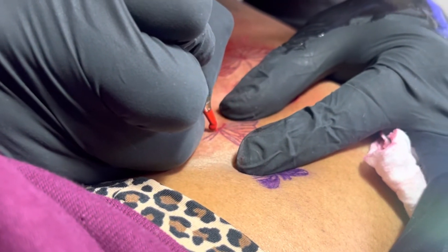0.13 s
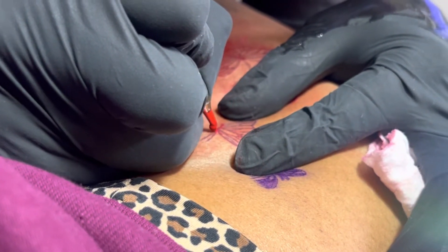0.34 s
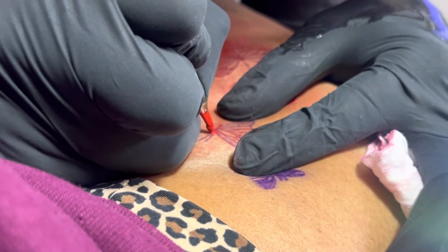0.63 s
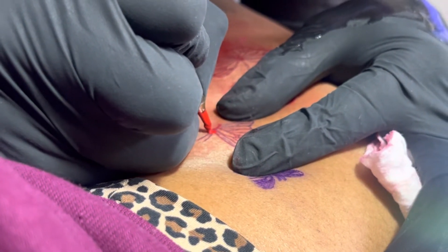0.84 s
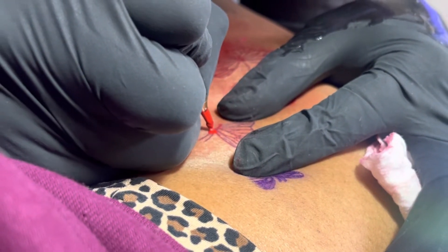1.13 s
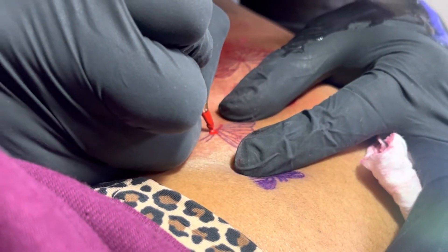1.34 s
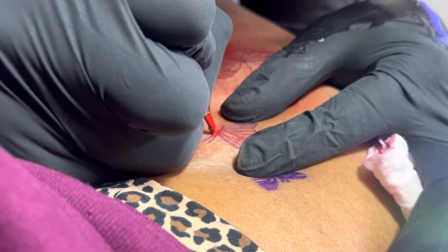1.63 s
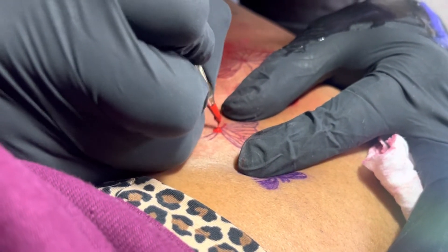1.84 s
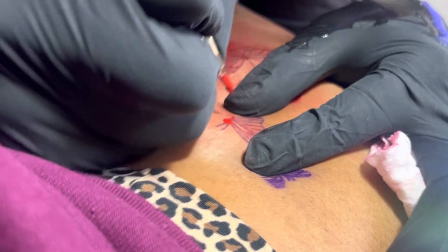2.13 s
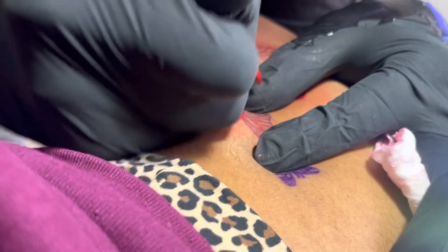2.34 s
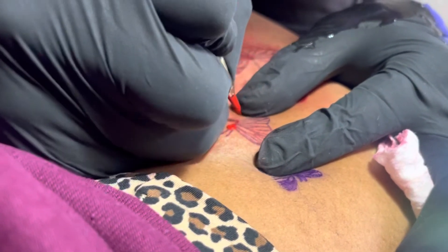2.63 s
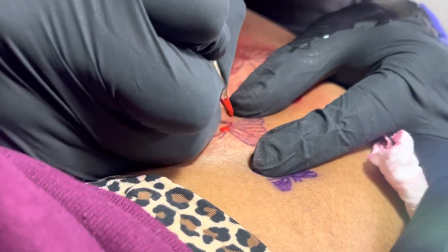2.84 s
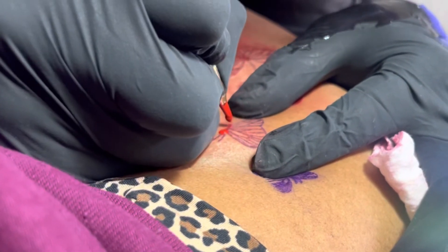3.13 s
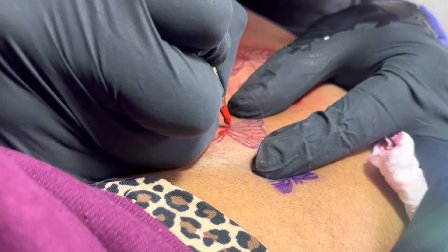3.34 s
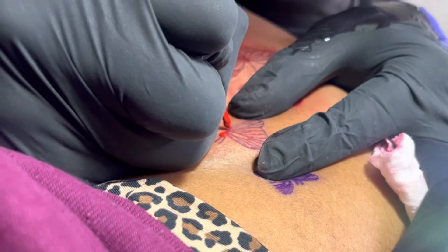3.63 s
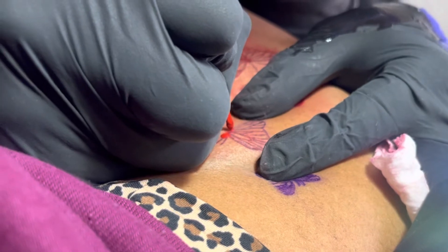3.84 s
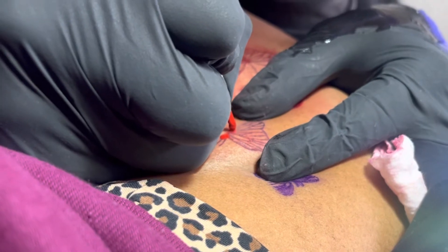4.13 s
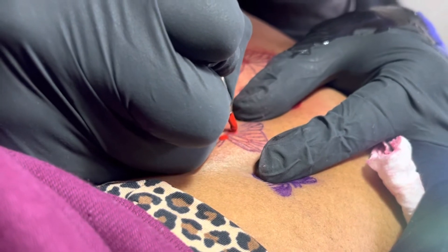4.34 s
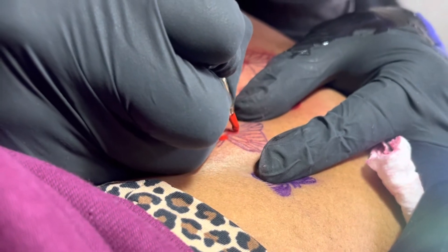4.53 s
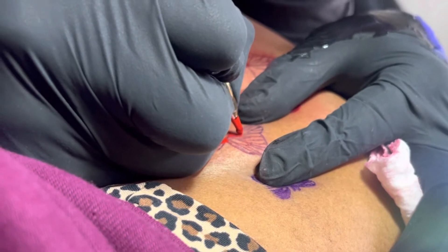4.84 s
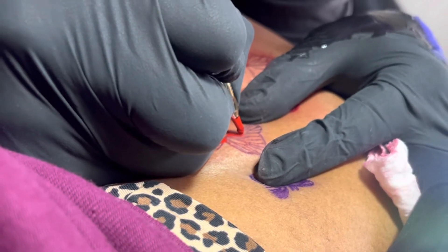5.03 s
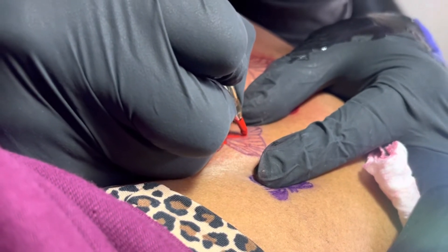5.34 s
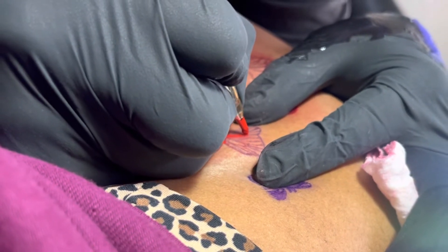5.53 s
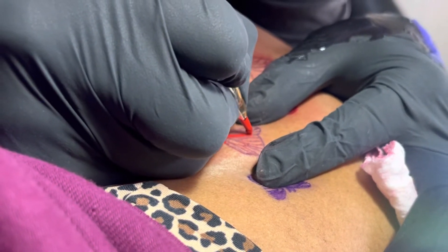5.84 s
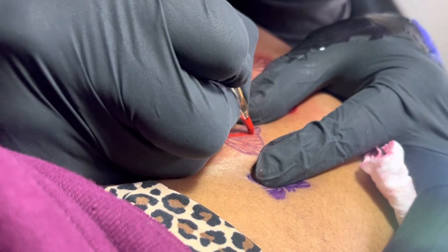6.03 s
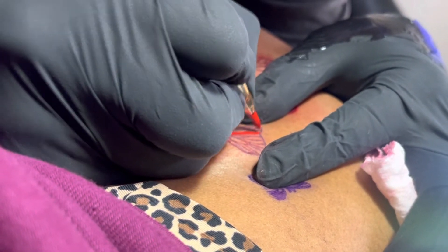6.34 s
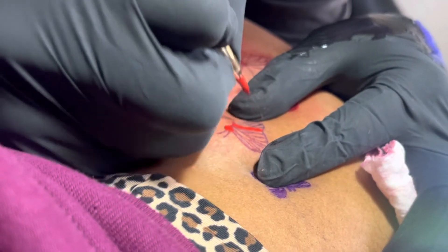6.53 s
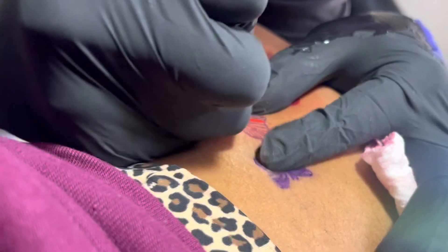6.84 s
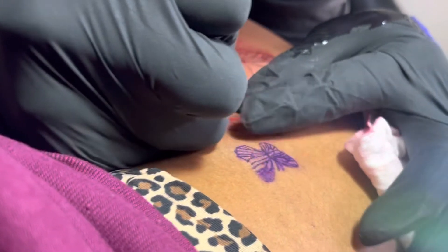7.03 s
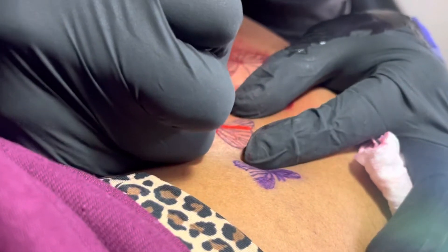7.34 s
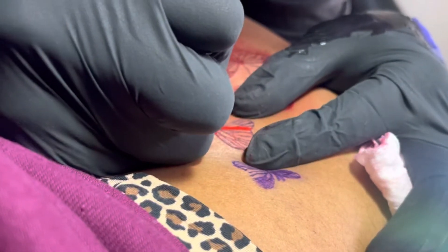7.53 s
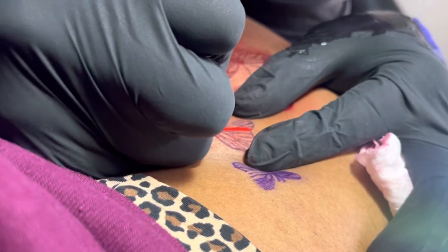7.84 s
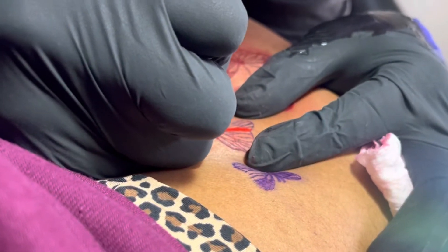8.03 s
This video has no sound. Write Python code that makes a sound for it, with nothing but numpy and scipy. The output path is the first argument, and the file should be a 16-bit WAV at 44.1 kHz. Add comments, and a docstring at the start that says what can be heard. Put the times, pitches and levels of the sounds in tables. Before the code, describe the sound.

A coil tattoo machine runs nonstop very close to a stereo microphone, a hard, bright metallic buzz with a low hum and fine rattling. Its tone wavers slightly as the hand lifts near two seconds and again after six. Behind it lies quiet studio air and street rumble; a vehicle's low drone swells briefly around three seconds and fades.

```python
"""A hard metallic buzz, about 107 strokes a second, is heard close by: a coil tattoo machine in a small studio.
Impact excitation: the armature bar strikes the coil core and rebounds, ringing the modes of the steel frame.
Periodic motion makes the frame hum in harmonics, and loose parts rattle as noise in bursts within each stroke.
Filtered noise forms the studio air and street rumble; resonant noise and a wavering drone form a vehicle
that swells through the room's low resonances. Two microphone ports differ in level and phase."""
import sys
import numpy as np
from scipy import signal
from scipy.fft import rfft, irfft, next_fast_len
from scipy.io import wavfile
from scipy.ndimage import uniform_filter1d, map_coordinates

SR = 44100
rng = np.random.default_rng(int(sys.argv[2]) if len(sys.argv) > 2 else 0)


def store_wav(level_fs):
    """Save 16-bit WAV to argv[1]."""
    pcm = np.round(np.clip(np.atleast_2d(level_fs), -1, 1) * 32767)
    wavfile.write(sys.argv[1], SR, pcm.T.astype(np.int16))


N = 361179

# Phase of the left port ahead of the right: (frequency [Hz], lead [rad])
PORT_LEAD = [(20, 0), (110, .4), (430, .7), (700, 1.2), (1000, 3.3), (1290, 6.4), (1390, 7), (1500, 8.8),
             (1610, 9.5), (1720, 12.9), (5000, 12.7), (5600, 12), (7840, 9.7), (9560, 9.1), (11000, 6.3),
             (13400, 5.7), (14400, 9.4), (15700, 9.4)]
# Likeness of the noise at the two ports: (frequency [Hz], likeness [0-1])
PORT_LIKENESS = [(50, 0.98), (150, 0.99), (300, 0.92), (700, 0.29), (1500, 0.041), (3000, 0.86),
                 (6000, 0.72), (8000, 1), (12500, 1)]

# Spectrum of studio air and street: (frequency [Hz], relative density [dB per Hz])
AIR_SPECTRUM = [(25, -39), (40, -4), (54, 4), (75, -3), (110, -4), (160, -13), (260, -18), (450, -21.5),
                (580, -14), (700, -22.5), (1060, -23), (1400, -27.5), (1700, -31.5), (2200, -36.5),
                (5000, -89)]
# Balance of that air: (frequency [Hz], left over right [dB])
AIR_BALANCE = [(50, 2.5), (300, 2.5), (1000, 1), (2000, 1.5)]
# Murmur around 600 Hz: (time [s], relative level [dB])
MURMUR_LEVEL = [(0.0, 0), (1.5, -3.5), (2.4, -1), (3.5, 0.5), (5.0, 0), (6.5, -0.5), (7.3, 2), (8.19, 2.5)]
AIR_DB = -48.5
BASS_SWELL_DB, MURMUR_SWELL_DB = 0.9, 1.6  # rms wander of each band

# Low room resonances: (frequency [Hz], width [Hz], relative level [dB])
DEEP_MODES = [(53.5, 7.1, 2.5), (85.3, 12, -1), (109, 18, -0.5)]
# Higher room resonances: (frequency [Hz], width [Hz], relative level [dB])
UPPER_MODES = [(184, 14, 5), (218, 14, 1), (260, 24, -10), (318, 9, -4), (342, 11, -3), (391, 22, -9),
               (456, 20, -13)]
# One vehicle leaving, one passing: (nearest time [s], level of deep part [dB], level of upper part [dB])
VEHICLE_PASSES = [(0.02, -41, -54.5), (2.92, -39, -46)]
# Swell, a row each for deep and upper part: (peak ahead of nearest [s], rise scale [s], fall scale [s])
SWELL_TIMES = [(.15, .5, 0.26), (.17, 0.4, 0.32)]
# Surges of the vehicle's drone at the left port: (time [s], level [dB])
DRONE_LEVEL = [(0.0, -70), (.3, -81), (2.0, -76), (2.26, -48.5), (2.46, -51), (2.58, -41.5), (2.68, -44),
               (2.77, -39), (2.92, -32.5), (3.01, -37), (3.18, -43), (3.33, -63), (3.5, -71), (8.19, -73)]
# Pitch course of the drone: (time [s], frequency [Hz])
DRONE_PITCH = [(0, 142), (2.5, 141), (2.75, 144), (2.92, 150), (3.2, 142), (8.19, 140)]
DRONE_WAVER_HZ, SURGE_DB = 3, 1.2  # rms waver of the drone's pitch; rms wander of the noise

# Stroke rate, sagging as the needle loads the spring: (time [s], rate [strokes per s])
STROKE_RATE = [(0.0, 106.75), (0.17, 107.4), (0.38, 106.75), (1.0, 106.8), (1.24, 107.1), (1.45, 106.75),
               (2.75, 106.9), (3.0, 107.35), (3.42, 107.4), (3.82, 106.55), (4.45, 106.65), (4.9, 106.0),
               (5.15, 106.45), (5.9, 106.2), (6.06, 106.55), (6.24, 106.15), (6.42, 107.05), (7.0, 107.05),
               (7.18, 106.65), (7.62, 107.35), (8.06, 107.35), (8.19, 107.1)]
RATE_WAVER_HZ = 0.16  # rms about that course

# The hand shifts along the line: (time [s], hand position [0-5])
HAND_POSITION = [(0, 0), (1.7, 0), (1.85, 1), (3.5, 1), (3.75, 2), (4.25, 2), (4.6, 3), (6.2, 3), (6.4, 4),
                 (6.6, 4), (6.8, 5), (8.19, 5)]
# The hand lifts to a new place: (time [s], height [0-1])
HAND_LIFT = [(0, 0), (1.66, 0), (1.72, .2), (1.8, 0), (1.95, .1), (2.12, .5), (2.25, .2), (2.42, .35),
             (2.55, 0), (6.27, 0), (6.36, 1), (6.58, .9), (6.7, .5), (6.85, .55), (7.08, 0), (8.19, 0)]
# Frame hum: (multiple of stroke rate, six left levels for hand positions 0 to 5 [dB], left over right [dB])
HUM_HARMONICS = [(1, -53, -51, -53, -53, -55, -51, 5), (2, -71, -70, -74, -67, -68, -70, 4),
                 (3, -61.5, -68, -60, -60, -73, -74, 4), (4, -69, -71, -67, -69, -71, -72, 5),
                 (5, -75, -73, -70, -72, -71, -72, 3), (6, -60, -60, -61, -60, -59, -57, 9),
                 (7, -59, -59, -59, -58, -60, -61, 14), (8, -55, -56, -58, -64, -57, -57, 13),
                 (9, -56, -56, -58, -61, -59, -57, 22), (10, -55, -55, -56, -55, -54, -54, 19),
                 (11, -56, -57, -59, -61, -60, -56, 10), (12, -56, -65, -60, -62, -74, -61, 11),
                 (13, -70, -72, -69, -71, -67, -78, 0), (14, -67, -70, -75, -68, -73, -68, 3),
                 (15, -74, -74, -74, -73, -78, -77, -2), (16, -76, -80, -74, -77, -72, -77, 2),
                 (17, -83, -80, -87, -85, -92, -87, 0), (18, -76, -79, -79, -78, -87, -81, 1),
                 (19, -74, -81, -81, -81, -77, -79, 2), (20, -78, -84, -84, -80, -84, -82, 3),
                 (21, -86, -84, -80, -82, -77, -81, 2), (22, -72, -78, -80, -77, -82, -79, 19),
                 (23, -61, -65, -63, -67, -75, -64, 12)]

# Loose needle bar and spring, left port: (frequency [Hz], relative density [dB per Hz])
RATTLE_LEFT = [(1500, -32), (2300, -35), (2900, -17), (3400, -7), (3800, -2), (4800, -4.5), (6200, -10),
               (7800, 2), (9300, -16.5), (11500, -17), (12700, -5), (13600, -8), (14100, -42), (14600, -36),
               (15700, -48)]
# The same at the right port: (frequency [Hz], relative density [dB per Hz])
RATTLE_RIGHT = [(1500, -30), (2300, -10), (2900, 3), (3400, -25), (3800, -13), (4800, -4.5), (6200, -13),
                (7800, -1.5), (9300, -10.5), (11500, -18), (12700, -5), (13600, -20), (14100, -38),
                (14600, -35), (15700, -48)]
# Bursts within a stroke: (time after strike [s], decay constant [s], relative level [dB])
RATTLE_BURSTS = [(.0009, 0.0008, -6), (.0022, 0.0012, -8), (.0036, 0.0008, -6)]
RATTLE_FLOOR_DB = -5  # under the bursts, on their scale
RATTLE_DB, RATTLE_WANDER_DB = -53, 1.4  # centre and rms wander, before the body's high-pass
RATTLE_ECHO = 0.46  # share that returns inverted at the rebound

# Strike as the machine turns: (time [s], relative level [dB], extra for modes above 3400 Hz [dB],
# left over right [dB])
STRIKE_LEVEL = [(0.0, -48.5, 3.5, 2), (1.55, -47.5, 2, 1.5), (1.8, -48.5, 4, 2.5), (2.05, -47.5, 1.5, 0.5),
                (2.44, -50.5, 2.5, 3.5), (2.51, -48, 2, 1), (6.14, -47.5, 2, 2.5), (6.52, -50, 2, 2.5),
                (7.66, -47, 0.5, 1.5), (8.19, -47.5, 0, 1)]
# The bar's rebound off the core: (time [s], delay after strike [ms], relative level [dB])
REBOUND_COURSE = [(0.0, 1.73, 0), (1.64, 1.74, 0), (1.76, 1.86, 0), (1.82, 1.72, 0), (1.94, 1.77, 0),
                  (2.13, 1.68, 0), (2.2, 1.8, 0), (2.27, 1.83, 0), (2.31, 1.74, 0), (2.35, 1.8, 0),
                  (2.4, 1.68, 0), (2.45, 1.77, 0), (2.52, 1.73, 0), (2.76, 1.74, 0), (4.0, 1.74, 0),
                  (4.6, 1.72, 1), (6.22, 1.72, 1), (6.3, 1.85, 0), (6.38, 1.64, 0), (6.44, 1.75, 0),
                  (6.51, 1.62, 0), (6.7, 1.81, 0), (6.76, 1.74, 0), (6.8, 1.77, 0), (6.84, 1.7, 0),
                  (6.89, 1.8, 0), (7.02, 1.74, 0), (8.19, 1.74, 0)]
# Frame modes: (frequency [Hz], t60 before damping [s], relative left level [dB], relative right level [dB],
# rebound over strike [dB], build-up [ms], extra in hand position 3 [dB], extra at full lift [dB])
FRAME_MODES = [(2560, 0.036, -0.5, -9.5, -18, 0.047, 0, 3.5), (3097, 0.011, -1.5, -17, -1, 0.12, 0.5, -4),
               (3765, 0.052, -19, -11, -6.5, 0.03, 0.5, 2), (4140, 0.0032, -3.5, 4, -13, 0.26, 2.5, 2.5),
               (4340, 0.04, 7, 6, -3, 0.33, 0, 2.5), (4340, 0.066, 6, 3.5, -2.5, 0.031, 0, 2.5),
               (4842, 0.0087, -1, 1.5, -6, 0.18, -1, -6), (5550, 0.012, -17.5, -33, 4, 0.026, -1, 1),
               (6037, 0.051, -26.5, -29.5, 7.5, 0.03, 4, 2), (6370, 0.018, -18, -15.5, -17, 0.034, 3, 4.5),
               (7464, 0.046, -13, -11.5, -5, 0.081, 0, -0.5), (10490, 0.0014, -3.5, -7.5, -6, 0.28, 0.5, 2),
               (12760, 0.0081, -19, -10, -4.5, 0.5, 0.5, 1.5)]
STRIKE_WANDER_DB, REBOUND_WAVER_MS = 0.6, 0.006  # both rms
FREE_RING_S, DAMPING_S = 0.0013, 0.0029  # free ringing, then the touch damps with this time constant
RING_TOP_HZ = (8300, 13700)  # low-pass of the modes up to 9000 Hz, and of those above
SCATTER_DB, LIFT_SCATTER_DB = -18, 2  # scatter relative to the direct sound; its gain at full lift
SCATTER_T60 = 0.044  # s, reflections from hands, skin and chair
STIR = 4  # rad per s by which a full lift turns the blend of reflections
BODY_HZ = 2173  # the small frame radiates little of its ring below this
EDGE_HZ = 15725  # upper band limit


def gain_of(db):
    """Logarithmic level: amplitude ratio of a level in dB."""
    return 10 ** (np.asarray(db) / 20)


def evened(x):
    """Normalisation: scales a signal to rms 1."""
    return x / np.sqrt(np.mean(x ** 2) + 1e-20)


def read(points, hz):
    """Interpolation on a logarithmic frequency axis: a spectrum table read at hz."""
    f, value = np.transpose(points)
    return np.interp(np.log(hz + 1), np.log(f + 1), value)


def curves(rows):
    """Linear interpolation in time: every column of a time table, sample by sample."""
    s, *columns = np.transpose(rows)
    return [np.interp(np.arange(N) / SR, s, column) for column in columns]


def drift(top_hz, low_hz=0.15):
    """Superposition: slow sines of random phase add to a wandering curve of rms 1."""
    t = np.arange(0, N + 256, 256) / SR
    f = np.geomspace(low_hz, top_hz, 16)[:, None]
    slow = (np.sin(2 * np.pi * (f * t + rng.random(f.shape))) / np.sqrt(f)).sum(0)
    return np.interp(np.arange(N) / SR, t, evened(slow))


def port_noise(left, right, lead=1):
    """Partial coherence: shaped noise at two ports; left and right map Hz to dB."""
    size = next_fast_len(N)
    hz = np.fft.rfftfreq(size, 1 / SR)
    a, b = rfft(rng.standard_normal((2, size)))
    same = np.clip(read(PORT_LIKENESS, hz), 0, 1)
    b = same * a + np.sqrt(1 - same ** 2) * b
    b = b * np.exp(-1j * lead * read(PORT_LEAD, hz))
    spectra = np.array([a * gain_of(left(hz)), b * gain_of(right(hz))])
    return evened(irfft(spectra, size)[:, :N])


def air():
    """Spectral shaping of noise: studio air and distant traffic, with bass and murmur swelling separately."""
    bed = gain_of(AIR_DB) * port_noise(
        lambda hz: read(AIR_SPECTRUM, hz),
        lambda hz: read(AIR_SPECTRUM, hz) - read(AIR_BALANCE, hz))
    bass = signal.sosfiltfilt(signal.butter(2, 110, fs=SR, output="sos"), bed)
    murmur = signal.sosfiltfilt(signal.butter(2, [480, 680], "band", fs=SR, output="sos"), bed)
    bass_gain = gain_of(BASS_SWELL_DB * drift(2.6, 0.32))
    murmur_gain = gain_of(curves(MURMUR_LEVEL)[0] + MURMUR_SWELL_DB * drift(8.0, 0.396))
    return bed + bass * (bass_gain - 1) + murmur * (murmur_gain - 1)


def room_noise(table):
    """Resonance: noise gathers at the room modes; its short-term power is held even."""
    def modes(hz):
        power = sum(gain_of(2 * db) / (1 + (2 * (hz - f) / width) ** 2) ** 2 for f, width, db in table)
        return 10 * np.log10(power)

    noise = port_noise(modes, lambda hz: modes(hz) - 1.0, lead=0.37)
    return noise / np.sqrt(uniform_filter1d((noise ** 2).mean(0), 4000))


def vehicle_drone():
    """Frequency modulation: a sine of wavering pitch comes in surges, slightly weaker and later at right."""
    pitch = curves(DRONE_PITCH)[0] + DRONE_WAVER_HZ * drift(14.0, 3.0)
    phase = 2 * np.pi * np.cumsum(pitch) / SR - np.array([[0], [0.2]])
    level = curves(DRONE_LEVEL)[0] - np.array([[0], [0.8]])
    return gain_of(level) * np.sqrt(2) * np.sin(phase)


def vehicle():
    """Room resonance: engine and tyre noise from outside swells and fades through the low modes."""
    t = np.arange(N) / SR
    out = vehicle_drone()
    for k, table in enumerate([DEEP_MODES, UPPER_MODES]):
        steady = room_noise(table) * gain_of(SURGE_DB * drift(9.0, 2.51))
        early, rise, fall = SWELL_TIMES[k]
        for nearest, *db in VEHICLE_PASSES:
            away = t - nearest + early
            away = away / np.where(away < 0, rise, fall)
            # one rise or fall scale away from the peak, the level is 5.45 dB lower
            drop_db = 5.45 * abs(away) ** np.where(away < 0, 1.3, 1.9)
            out = out + gain_of(db[k] - drop_db) * steady
    return out


def strokes():
    """Phase accumulation: the stroke rate integrated to a stroke count at each sample."""
    rate, = curves(STROKE_RATE)
    return 0.85 + np.cumsum(rate + RATE_WAVER_HZ * drift(9.0, 2.5)) / SR


def hum(turns):
    """Fourier series: multiples of the stroke rate whose strengths change with the hand."""
    hand, = curves(HAND_POSITION)
    out = np.zeros((2, N))
    turn = np.exp(2j * np.pi * turns)
    harmonic = 1
    for k, *db, left_db in HUM_HARMONICS:
        harmonic = harmonic * turn  # rows hold successive multiples
        size = np.sqrt(2) * np.interp(hand, range(len(db)), gain_of(db))
        size = size * (1 + 0.12 * drift(3.0))
        right = gain_of(-left_db) * np.exp(-1j * read(PORT_LEAD, k * STROKE_RATE[0][1]))
        ports = np.exp(2j * np.pi * rng.random()) * np.array([[1], [right]])
        out += size * (ports * harmonic).real
    return out


def above_body(x):
    """Radiation efficiency: a high-pass removes what lies below the frame's radiating range."""
    return signal.sosfilt(signal.cheby2(7, 36, BODY_HZ, "high", fs=SR, output="sos"), x)


def rattle(since):
    """Amplitude modulation: noise of loose parts, shaken in bursts by each strike, rebound and lift-off."""
    shake = gain_of(RATTLE_FLOOR_DB)
    for s, decay, db in RATTLE_BURSTS:
        time_constant = np.where(since > s, decay, 0.0002)  # quick onset ahead of the peak
        shake = shake + gain_of(db) * np.exp(-abs(since - s) / time_constant)
    noise = port_noise(lambda hz: read(RATTLE_LEFT, hz), lambda hz: read(RATTLE_RIGHT, hz))
    earlier = np.arange(N) - curves(REBOUND_COURSE)[0] * SR / 1000
    repeated = np.array([map_coordinates(port, [earlier], order=3) for port in noise])
    noise = evened(noise - RATTLE_ECHO * repeated)
    return gain_of(RATTLE_DB + RATTLE_WANDER_DB * drift(6.6)) * evened(shake) * noise


def clicks(s, size):
    """Band-limited impulses: short windowed sinc pulses centred between samples at the exact times s."""
    near = np.round(s * SR).astype(int)[:, None] + np.arange(-8, 9)
    off = near - s[:, None] * SR
    pulse = size[:, None] * np.sinc(off) * np.cos(np.pi * off / 18) ** 2
    return np.bincount(np.clip(near, 0, N).ravel(), pulse.ravel(), N + 1)[:N]


def impacts(turns):
    """Collision and recoil: a pulse train of strikes and one of opposite-signed rebounds."""
    s = np.interp(np.arange(1, int(turns[-1]) + 1), turns, np.arange(N) / SR)
    chance = rng.standard_normal((len(s), 4)).T
    delay_ms, rebound_db = curves(REBOUND_COURSE)
    delay_ms = delay_ms + REBOUND_WAVER_MS * drift(10.0, 2.0)
    strike = s + 0.000006 * chance[0]
    rebound = strike + delay_ms[(s * SR).astype(int)] / 1000 + 0.000004 * chance[1]
    first = clicks(strike, gain_of(0.66 * chance[2]))
    second = -clicks(rebound, gain_of(0.94 * chance[3])) * gain_of(rebound_db)
    return first, second


def mode_ring(hz, t60, port_db, rise_ms):
    """Damped oscillation: one mode's impulse response at both ports, cut short by the next touch."""
    u = np.arange(400) / SR
    rise = np.clip(1000 * u / max(rise_ms, 0.02), 0, 1)
    shape = rise * np.exp(-np.maximum(u - FREE_RING_S, 0) / DAMPING_S)
    phase = 2 * np.pi * hz * u - np.array([[0], [read(PORT_LEAD, hz)]])
    ring = gain_of(np.array(port_db)[:, None] - 60 * u / t60) * shape * np.sin(phase)
    return signal.convolve(ring, signal.firwin(61, RING_TOP_HZ[int(hz > 9000)], fs=SR)[None])


def scattered(direct, raised):
    """Multiple scattering: two sets of nearby reflections, blended as the hand drifts and lifts."""
    lag = np.arange(1200) / SR
    taps = rng.standard_normal((2, len(lag))) * gain_of(-60 * lag / SCATTER_T60) * (lag > 0.0012)
    taps /= np.linalg.norm(taps, axis=1, keepdims=True)
    blend = 0.59 * drift(0.96) + STIR * np.cumsum(raised) / SR
    one, two = (signal.oaconvolve(direct, tap[None], axes=1)[:, :N] for tap in taps)
    return gain_of(SCATTER_DB + LIFT_SCATTER_DB * raised) * (np.cos(blend) * one + np.sin(blend) * two)


def frame(turns):
    """Modal superposition: strike and rebound ring the frame's modes; nearby surfaces scatter the sound."""
    first, second = impacts(turns)
    strike_db, upper_db, turn_db = curves(STRIKE_LEVEL)
    pressed = np.clip(1 - abs(curves(HAND_POSITION)[0] - 3), 0, 1)  # nearness to hand position 3
    raised = np.clip(curves(HAND_LIFT)[0], 0, 1)
    out = np.zeros((2, N))
    for k, (hz, t60, left_db, right_db, rebound_db, rise_ms, pressed_db, raised_db) in enumerate(FRAME_MODES):
        ring = mode_ring(hz, t60, (left_db, right_db), rise_ms)
        drive = (-1) ** k * (first + gain_of(rebound_db) * second)  # polarity alternates between modes
        level = upper_db * (hz > 3400) + pressed_db * pressed + raised_db * raised
        out += gain_of(level) * signal.oaconvolve(drive[None], ring, axes=1)[:, :N]
    balance = np.array([np.zeros(N), turn_db])
    out *= gain_of(12.0 + strike_db + STRIKE_WANDER_DB * drift(8.0, 1.5) - balance)
    return above_body(out + scattered(out, raised))


def scene():
    """Linear superposition: all sources add at the two ports."""
    turns = strokes()
    since_strike = turns % 1 / STROKE_RATE[0][1]  # s, at the opening stroke rate
    machine = hum(turns) + frame(turns) + above_body(rattle(since_strike))
    return machine + air() + vehicle()


def record(dry):
    """Band limitation: a steep low-pass removes what lies above the upper edge."""
    return signal.oaconvolve(dry, signal.firwin(511, EDGE_HZ, window=("kaiser", 9), fs=SR)[None], "same")


dry = scene()
out = record(dry)
store_wav(out)
```